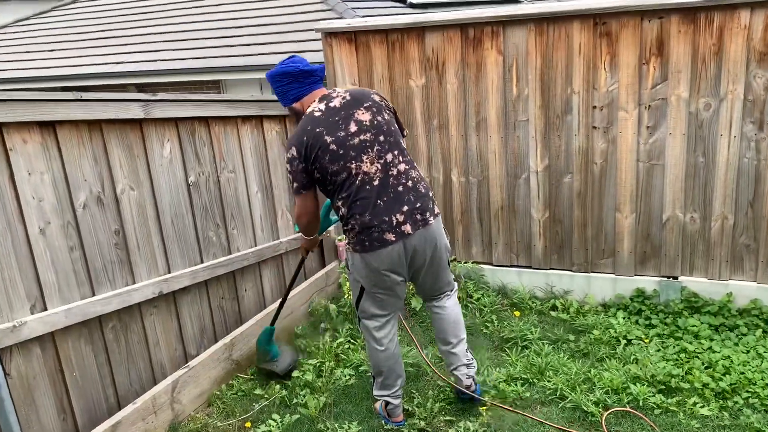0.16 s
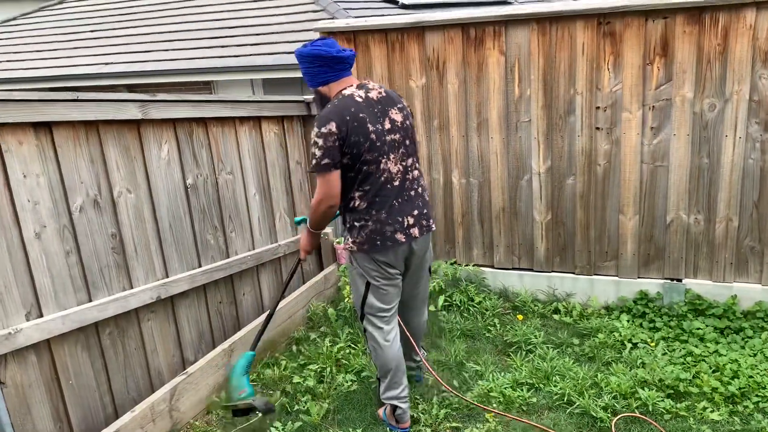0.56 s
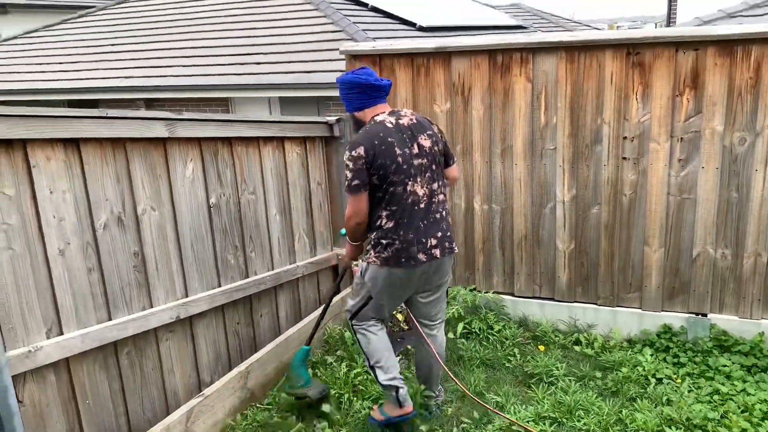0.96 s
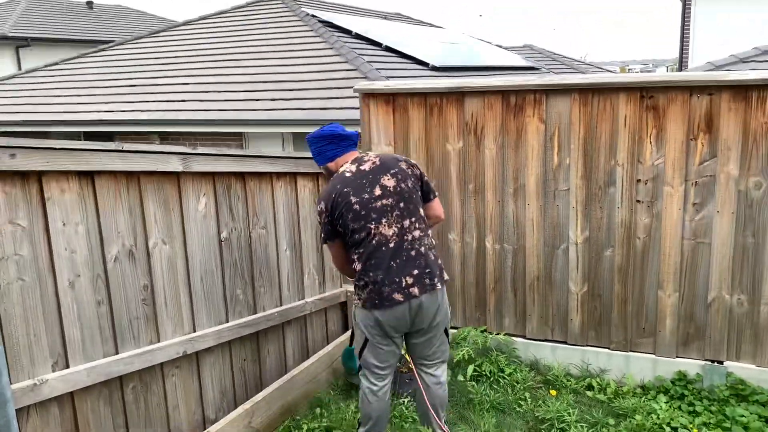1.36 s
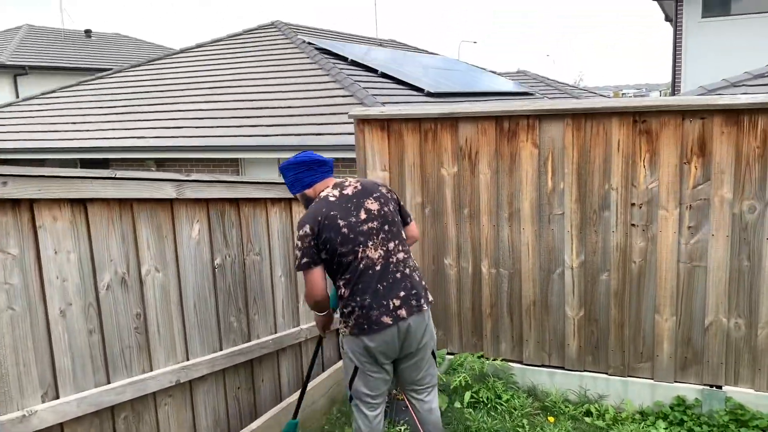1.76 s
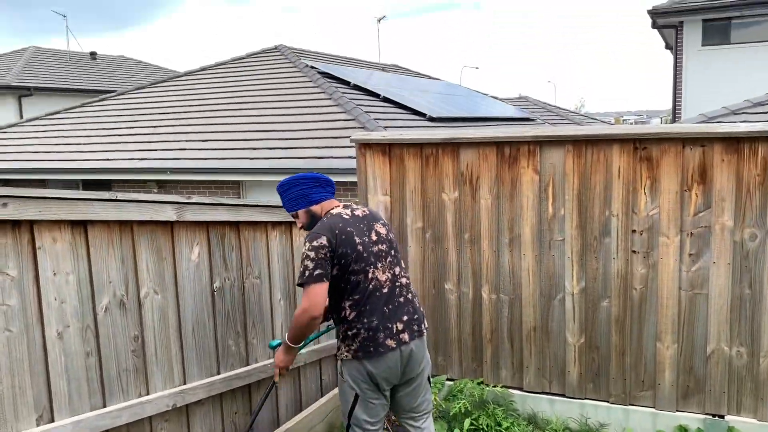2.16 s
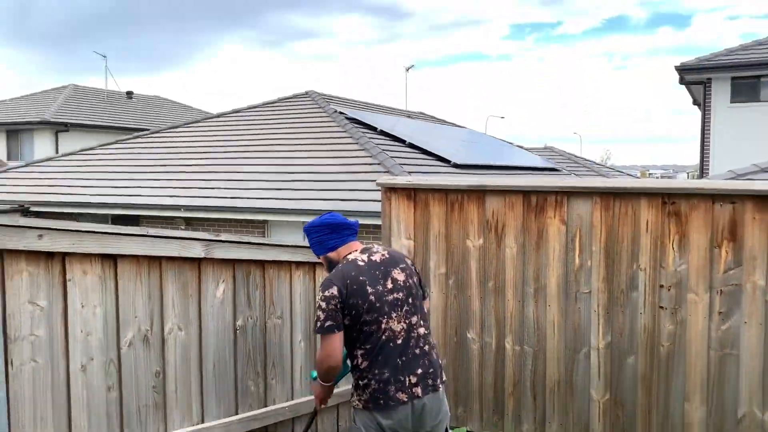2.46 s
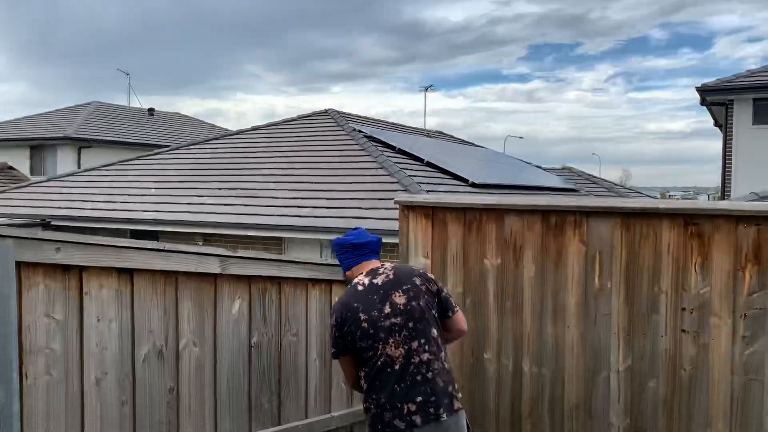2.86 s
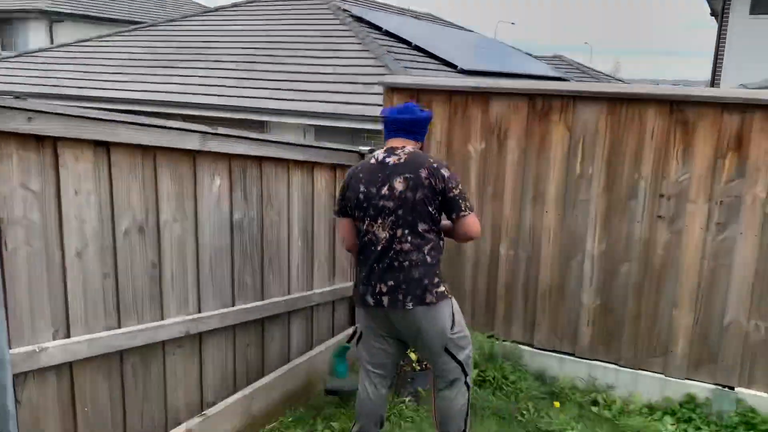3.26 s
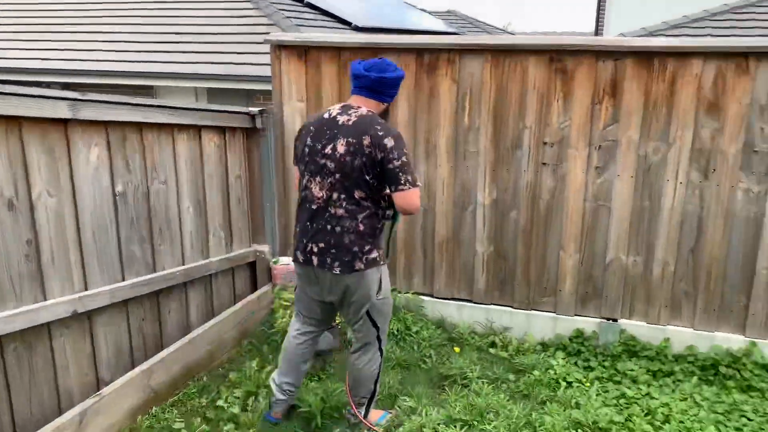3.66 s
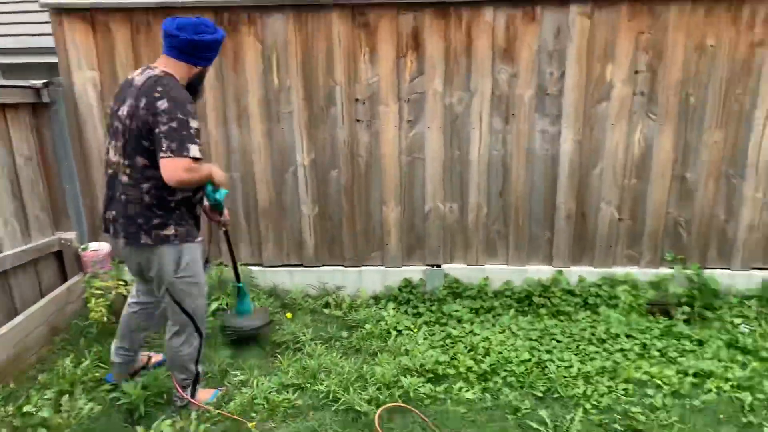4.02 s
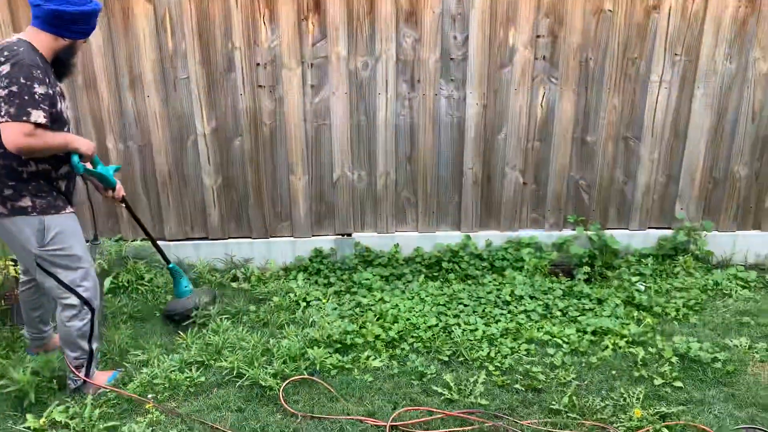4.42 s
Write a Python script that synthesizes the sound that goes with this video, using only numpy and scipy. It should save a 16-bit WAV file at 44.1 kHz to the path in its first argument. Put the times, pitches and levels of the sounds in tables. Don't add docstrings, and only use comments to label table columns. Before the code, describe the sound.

An electric string trimmer works along a wooden fence a few metres from a stereo camera microphone. It starts near full speed, a low motor hum around 190 Hz under airy line whistle, leafy fizz and rapid whipping. At 0.3 s the trigger is released and the pitch and whistle sink, with a snap near 0.7 s. Around 1 s it spins up again, knocking low and hollow near 1.3 s, with a hard crack at 1.4 s. It bogs in thick weeds at about 1.6-1.9 s, rough and throbbing, then recovers to a bright whine by 2.3 s. Sharp snaps and a knock come at 2.5-2.6 s. From 2.8 s it coasts down, growing deeper and quieter, with a brief brush at 3.55 s and tiny ticks after 4.1 s. At 4.3 s it bites back in with snaps and bright knocks, cut off while speeding up. Light wind and suburban rumble lie beneath, with short board echoes.

```python
import sys
import numpy as np
from scipy import signal
from scipy.fft import rfft, irfft, next_fast_len
from scipy.io import wavfile
from scipy.ndimage import uniform_filter1d, map_coordinates

SR = 44100
rng = np.random.default_rng(int(sys.argv[2]) if len(sys.argv) > 2 else 0)


def volts_from_decibels(level):
    exponent = np.asarray(level, float) / 20
    return 10 ** exponent


def store_pcm(level_fs):
    pcm = np.round(np.clip(level_fs, -1, 1) * 32767).astype(np.int16)
    wavfile.write(sys.argv[1], SR, np.atleast_2d(pcm).T)


N = 202379
T_S = np.arange(N) / SR


def unit(x):
    return x / np.sqrt(np.mean(x ** 2) + 1e-20)


def along(points, hz):
    f, value = np.transpose(points)
    return np.interp(np.log(hz + 1), np.log(f + 1), value)


def curves(rows):
    s, *columns = np.transpose(rows)
    return [np.interp(T_S, s, column) for column in columns]


def wobble(rate_hz):
    knots = rng.standard_normal(int(N * rate_hz / SR) + 4)
    return map_coordinates(knots, [np.arange(N) * rate_hz / SR])


def filtered(x, response):
    size = next_fast_len(N + 8192)
    return irfft(rfft(x, size) * response(np.fft.rfftfreq(size, 1 / SR)), size)[..., :N]


def coloured_noise(spectrum):
    return unit(filtered(rng.standard_normal((2, N)), lambda hz: volts_from_decibels(along(spectrum, hz))))


# t/s, f/Hz
DRIVEN_SPEED = [(0, 190.2), (.08, 185.2), (.31, 193), (1.07, 131.4), (1.15, 151.6), (1.32, 165.4),
                (1.53, 173.4), (1.65, 161), (1.78, 150), (1.88, 146.9), (1.99, 166.7), (2.12, 177.6),
                (2.31, 188.5), (2.45, 187.4), (2.62, 173.3), (2.79, 178.1), (4.47, 98.9), (4.59, 128.2)]
# let go t/s, pulled again t/s
COASTS = [
    (.31, .99),
    (2.79, 4.3),
]
EVEN_HZ = 63.3
SLOWING_RAD_PER_S = 0.357


def shaft():
    def run_down(off, now):
        start_hz = np.interp(off, *np.transpose(DRIVEN_SPEED))
        return EVEN_HZ * np.tan(np.arctan(start_hz / EVEN_HZ) - SLOWING_RAD_PER_S * (now - off))

    ends = [(on, run_down(off, on)) for off, on in COASTS]
    speed_hz, = curves(sorted(list(DRIVEN_SPEED) + ends))
    for off, on in COASTS:
        coasting = (T_S > off) & (T_S < on)
        speed_hz = np.where(coasting, run_down(off, np.clip(T_S, off, on)), speed_hz)
    return uniform_filter1d(speed_hz, size=SR // 40, mode="nearest")


FULL_HZ = 180


def speed_decades(speed_hz):
    return np.log10(speed_hz / FULL_HZ)


# t/s, depth over spinning free/dB, leafiness/dB, stalkiness/dB
WEEDS = [(0, 1, 3.5, -0.5), (.2, -2.5, -1, -16), (.6, 2.5, 4.5, -1), (.76, 1.5, 1, 7.5),
         (1.0, 1.5, 4.5, 1.5), (1.36, 7.5, 1, 0.5), (1.48, 6, 1.5, 6.5), (1.7, 12, 1.5, 2.5),
         (1.86, 13.5, -1.5, 5), (1.94, 4, 0.5, -1), (2.09, 7.5, 2, -19), (2.3, -0.5, 8.5, -27),
         (2.45, 6, 0, -26), (2.6, 8, 1, 4.5), (2.8, -2, 3.5, 0.5), (3.75, 1.5, 1, 5), (4.0, -7, 4, 0),
         (4.33, 8, 1.5, 7)]
# t/s, extra depth/dB, decay/s
CLUMPS = [(.05, 5.5, 0.13), (1.069, 0.5, 0.032), (1.385, 1.5, 0.025), (1.56, 1.5, 0.017), (1.72, 3.5, .05),
          (1.775, 1.5, 0.016), (1.83, 5.5, 0.027), (1.64, 1, 0.047), (2.505, 4, 0.027), (2.425, 5.5, 0.041),
          (2.573, 5.5, 0.0068), (3.555, 12, 0.043), (4.21, 8, 0.054), (4.405, 0.5, 0.045), (4.45, 8, 0.12),
          (4.57, -2, 0.015)]
# t/s, line ends in clear air/dB, guard rattling free/dB
CLEAR_AIR = [(0, -6.5, -3), (.35, -3.5, 2.5), (.7, 4.5, 1), (.86, 0, -4), (1.0, -0.5, -1), (1.1, 2, -1.5),
             (1.48, -3.5, -3.5), (1.6, -20, 2.5), (1.8, -8, 4.5), (1.9, 1.5, -5.5), (2.2, 5, 6.5),
             (2.39, -2, 5), (2.47, -20, 6.5), (2.75, -4.5, -3), (2.83, -1.5, -3), (4.04, 1, -5.5),
             (4.1, -1, -4), (4.59, -3.5, -1.5)]
CLUMP_RISE_S = 0.026
FIZZ_LINGERS_S, FIZZ_RETURNS_S = 0.16, 0.2


def effort(speed_hz):
    decades = speed_decades(speed_hz)
    clear_db, rattle_db = curves(CLEAR_AIR)
    depth_db, leafy_db, stalky_db = curves(WEEDS)
    for s, db, decay_s in CLUMPS:
        after, before = np.clip(T_S - s, 0, None), np.clip(s - T_S, 0, None)
        depth_db = depth_db + db * np.exp(-after / decay_s - before / CLUMP_RISE_S)
    slack = 0
    for off, on in COASTS:
        loosens = np.clip((T_S - off - FIZZ_LINGERS_S) / 0.058, 0, 1)
        tightens = np.clip((on + FIZZ_RETURNS_S - T_S) / 0.017, 0, 1)
        slack = slack + loosens * tightens
    whip_db = -33.5 + 56.5 * decades + depth_db
    return dict(
        whistle_db=-17 + 78 * decades + clear_db,
        whip_db=whip_db,
        fizz_db=whip_db + 10 + leafy_db - 5.5 * slack + 7.5 * decades,
        thud_db=whip_db - 9.5 - 18.5 * decades - 0.12 * clear_db + stalky_db,
        buzz_db=whip_db + 1.5 - 0.56 * depth_db + rattle_db,
        bite=np.clip(0.38 + 0.004 * depth_db, 0, 1),
        shake=np.clip(0.045 * depth_db, 0, 1))


HUM_DB = [-39, -44, -47, -50, -66, -66, -66]
# t/s, peak level/dB, half length/s
ORDER_1 = [(.04, -27, 0.12), (.29, -16, 0.077), (0.508, -25, 0.028), (0.6, -33.5, 0.075),
           (1.115, -24, 0.064), (1.252, -24, 0.094), (1.495, -33, 0.09), (1.7, -25, 0.087),
           (1.972, -23.5, 0.032), (2.132, -26, .06), (2.318, -17, 0.16), (2.746, -26, 0.097),
           (2.93, -27, 0.026), (3.095, -27, 0.14), (3.522, -37.5, 0.067)]
ORDER_2 = [(.4, -31.5, 0.093), (.72, -32, 0.047), (1.25, -36.5, 0.097), (1.5, -31.5, 0.11),
           (1.738, -21, .12), (2.08, -32.5, 0.14), (2.59, -28, 0.089), (2.85, -34.5, 0.099),
           (3.1, -38.5, 0.079), (3.51, -41.5, 0.052), (4.57, -28, 0.13)]
ORDER_3 = [
    (.2, -39, 0.091),
    (.5, -42, 0.012),
    (1.15, -40, 0.15),
    (1.42, -47, 0.023),
    (1.8, -29, 0.072),
    (2.12, -34, 0.19),
    (2.4, -31.5, 0.16),
    (2.7, -36, 0.064),
    (2.95, -44.5, 0.15),
    (4.48, -36.5, 0.068),
]
ORDER_4 = [
    (.29, -30, 0.044),
    (.48, -46.5, 0.2),
    (1.7, -28, 0.11),
    (1.98, -39, 0.1),
    (2.33, -34, 0.11),
    (2.5, -35, 0.049),
    (2.74, -34.5, 0.063),
    (4.51, -31, 0.026),
]
ORDER_5 = [
    (2.3, -41, 0.12),
    (3.0, -45, 0.052),
]
ORDER_6 = [
    (1.5, -32.5, 0.1),
    (2.78, -29.5, 0.047),
    (4.52, -39.5, 0.065),
]
ORDER_7 = [
    (.8, -38.5, 0.034),
    (2.5, -25.5, .05),
]


def swells(speed_hz):
    base_db = 24 * speed_decades(speed_hz)
    levels_db = []
    for db, rows in zip(HUM_DB, (ORDER_1, ORDER_2, ORDER_3, ORDER_4, ORDER_5, ORDER_6, ORDER_7)):
        level = volts_from_decibels(db + base_db)
        for s, peak_db, half_s in rows:
            level = level + volts_from_decibels(peak_db) * np.exp(-((T_S - s) / half_s) ** 2)
        levels_db.append(20 * np.log10(level))
    return levels_db


# order, level re buzz/dB
UPPER_ORDERS = [(5, -10), (8, -12.5), (11, -14), (14, -15.5), (20, -16), (32, -18)]


def hum(turns, order_db, buzz_db, shake):
    phase = 2 * np.pi * turns + (0.025 + 0.095 * shake) * wobble(50)
    low = high = 0
    for k, db in enumerate(order_db):
        low = low + volts_from_decibels(db + 3.5 + 2.4 * wobble(25.37)) * np.sin((k + 1) * phase + k)
    for order in range(5, 33):
        flicker_db = 2.6 * wobble(6.123) + 3 * wobble(18)
        level = volts_from_decibels(buzz_db + along(UPPER_ORDERS, order) + flicker_db)
        high = high + level * np.cos(order * phase + 1.25 * rng.random())
    return np.array([low + high, 0.063 * low + np.roll(high, 70)])


# multiple of shaft speed, level/dB
VORTEX = [(12, -40), (27, -24), (35, -10), (41, 0), (53, 0), (62, -8), (77, -18), (130, -29)]


def whistle(speed_hz):
    hz, t, z = signal.stft(rng.standard_normal((2, N)), SR, nperseg=512)
    gain = volts_from_decibels(along(VORTEX, hz[:, None] / np.interp(t, T_S, speed_hz)))
    gain = gain / np.sqrt(np.mean(gain ** 2, 0))
    return unit(signal.istft(z * gain, SR, nperseg=512)[1][:, :N])


def passes(turns, scatter_db, second_db, sharp):
    half = (2 * turns).astype(int)
    scatter = scatter_db * rng.standard_normal(half[-1] + 1)[half]
    since = 2 * turns % 1
    return unit(volts_from_decibels(scatter + second_db * (half % 2)) * np.sqrt(since) * np.exp(-sharp * since))


# f/Hz, level/dB
WHIP = [(60, -40), (200, -14), (500, -6.5), (900, -7), (2000, -5.5), (4000, -4), (8000, -38.5),
        (16000, -48.5)]
# f/Hz, level/dB
FIZZ = [(2500, -26.5), (5000, -10), (7500, -5.5), (9500, -2), (12000, -1.5), (13500, -6), (16000, -9.5)]
# f/Hz, level/dB
THUD = [(90, -30), (160, -4), (260, -1.5), (420, 3.5), (900, -7), (2000, -17)]


def line(speed_hz, turns, whistle_db, whip_db, fizz_db, thud_db, bite):
    sweep = passes(turns, scatter_db=-2.0, second_db=-9.0, sharp=1.97)
    lash = passes(turns + 0.16, scatter_db=5.5, second_db=4.5, sharp=9.1)
    strokes = (1 - bite) * sweep + bite * lash

    def throb(depth):
        return (1 - depth) + depth * strokes

    air = volts_from_decibels(whistle_db + 1.7 * wobble(11)) * throb(0.08) * whistle(speed_hz)
    fizz = volts_from_decibels(fizz_db + 1.5 + 0.59 * wobble(14)) * throb(0.78) * coloured_noise(FIZZ)
    whip = volts_from_decibels(whip_db + 0.29 * wobble(16)) * throb(0.49) * coloured_noise(WHIP)
    thud = volts_from_decibels(thud_db + 2.5 * wobble(18)) * throb(1.0) * coloured_noise(THUD)
    return air + fizz + whip + thud


# t/s, level/dB
WIND = [
    (0, -57),
    (.3, -59),
    (.5, -46),
    (.9, -45.5),
    (1.5, -36.5),
    (2.25, -38.5),
    (2.55, -49),
    (4.15, -57.5),
    (4.59, -33.5),
]
# f/Hz, level/dB
RUMBLE = [(20, -25), (35, -13), (50, -0.5), (90, -6), (140, -6.5), (300, -27.5)]
# f/Hz, level/dB
YARD = [(35, -12), (60, 5), (2710, -32.5), (7200, -46), (7900, -48), (12000, -57), (13500, -60),
        (15500, -34)]
YARD_DB = -43


def background():
    buffet = volts_from_decibels(curves(WIND)[0] + 2 + 3.2 * wobble(6.12)) * coloured_noise(RUMBLE)
    hush = volts_from_decibels(YARD_DB + wobble(2.85)) * coloured_noise(YARD)
    return buffet + hush


# t/s, peak level/dB, dull part re peak/dB, t60/s
SNAPS = [(0.6745, -12, -15.5, 0.02), (0.7384, -30, -27, 0.009), (1.0605, -22, -27, 0.039),
         (1.377, -5, -9.5, 0.055), (1.5703, -19, -26, 0.067), (1.8417, -7, -13, 0.055),
         (2.5744, -3, -30, 0.022), (2.617, -9, -19, 0.036), (3.521, -27, -21, 0.035),
         (4.1127, -33.5, -9, 0.034), (4.1504, -40, -2, 0.024), (4.1714, -50, -17, 0.03),
         (4.1873, -33, -7.5, 0.026), (4.2871, -37, -20, 0.026), (4.351, -42, -15, 0.029),
         (4.3917, -20.5, -19, 0.022), (4.4049, -20, -22, 0.03), (4.4418, -15, -17, 0.055),
         (4.4957, -15.5, -25, 0.042), (4.574, -8, -22.5, 0.036)]


def snaps():
    bright, dull = np.zeros(N + SR), np.zeros(N + SR)
    t = np.arange(SR // 8) / SR
    for s, db, dull_db, t60_s in SNAPS:
        fade = volts_from_decibels(db - 0.5 - 60 * t / t60_s)
        bright[round(s * SR):][:len(t)] += fade
        dull[round(s * SR):][:len(t)] += fade * volts_from_decibels(dull_db)
    return bright[:N] * coloured_noise(FIZZ) + dull[:N] * coloured_noise(WHIP)


# t/s, peak level/dB, f/Hz, t60/s
KNOCKS = [
    (1.27, -30, 274, .12),
    (1.329, -24.5, 287, 0.097),
    (2.505, -19, 1160, 0.063),
    (3.55, -35, 715, 0.082),
    (4.07, -38, 2080, 0.037),
    (4.35, -37, 550, 0.055),
    (4.402, -21, 1138, 0.039),
    (4.51, -25.5, 1150, 0.08),
    (4.57, -25, 1150, 0.048),
]


def knocks():
    out, t = np.zeros(N + SR), np.arange(SR // 5) / SR
    for s, db, hz, t60_s in KNOCKS:
        ring = 2.5 * np.sin(2 * np.pi * hz * t)
        attack = 1 - np.exp(-t / 0.0045)
        out[round(s * SR):][:len(t)] += volts_from_decibels(db - 60 * t / t60_s) * attack * ring
    return np.array([out[:N], 0.27 * out[:N]])


# delay t/s, level/dB
FENCE = [
    (.0041, -8.5),
    (.0073, -5),
    (0.0128, -8.5),
    (0.019, -14),
    (.0241, -31),
]


def fence(x):
    dull = filtered(x, lambda hz: 1 / (1 + 1j * hz / 2500))
    out = x
    for delay_s, db in FENCE:
        out = out + volts_from_decibels(db) * np.pad(dull, ((0, 0), (round(delay_s * SR), 0)))[:, :N]
    return out


# t/s, f of port opposition/Hz, likeness there 0-1
BEARING = [(0.152, 2820, 0.73), (.25, 2670, 0.44), (.7, 3120, 0.43), (.97, 3170, 0.4), (1.06, 3294, 0.75),
           (1.2, 4470, 0.8), (1.331, 4430, 0.6), (1.5, 3510, 0.61), (1.72, 3270, 0.81), (1.85, 2820, 0.2),
           (1.95, 2696, 0.7), (2.3, 2570, 0.83), (2.4, 2945, 0.2), (2.75, 4490, 0.46), (3.2, 3100, 0.4),
           (3.6, 2620, 0.09), (4.15, 4740, 0.55), (4.3, 2650, 0.3)]
# f/Hz, phase/rad
LEAD = [(6000, 6.3), (7000, 6), (8700, 3.1), (10300, .45), (11800, -.45), (12700, -2.5), (14200, -3.8),
        (15100, -5.8), (16000, -6.4)]
# f/Hz, likeness 0-1
ALIKE = [(60, 1), (300, 0.55), (700, 0.39), (1500, 1), (2200, 0.46), (4500, 0.043), (6500, 0.56)]
ALIKE_TOP = [(8300, .93), (16000, .97)]
# f/Hz, level/dB
TILT = [(60, -2), (110, 0.5), (200, 2.5), (380, 0.5), (700, -3), (1290, -0.5), (2380, -1.5), (4400, -0.5),
        (8120, -0.5), (15000, -1.5)]


def ports(pair):
    hz, t, z = signal.stft(pair, SR, nperseg=1024)
    s, null_hz, match = np.transpose(BEARING)
    null_hz, match = np.interp(t, s, null_hz), np.interp(t, s, match)
    lead_hz, lead_rad = np.transpose(LEAD)
    lead = np.transpose([np.interp(hz, [300, 0.45 * null, null, *lead_hz], [-0.1, 0.8, np.pi, *lead_rad])
                         for null in null_hz])
    near_null = np.exp(-((hz[:, None] - null_hz) / 900) ** 2)
    usual = along(list(ALIKE) + list(ALIKE_TOP), hz)[:, None]
    alike = (1 - near_null) * usual + near_null * match
    turn = np.arccos(np.clip(alike, -1, 1)) / 2
    mid, side = z[0] * np.cos(turn), z[1] * np.sin(turn)
    shift = np.exp(0.5j * lead) * volts_from_decibels(0.5 * along(TILT, hz))[:, None]
    return signal.istft([(mid + side) * shift, (mid - side) / shift], SR, nperseg=1024)[1][:, :N]


def scene():
    speed_hz = shaft()
    levels = effort(speed_hz)
    turns = np.cumsum(speed_hz) / SR
    head = hum(turns, swells(speed_hz), levels.pop("buzz_db"), levels.pop("shake"))
    cutting = line(speed_hz, turns, **levels)
    return ports(fence(cutting + knocks()) + head + background()) + fence(snaps())


# f/Hz, level/dB
MARGIN = [(2100, 4), (4500, 5.5), (8000, 7), (13500, 9.5)]


def joint_stereo(x, from_hz):
    hz, _, z = signal.stft([x[0] + x[1], x[0] - x[1]], SR, nperseg=2048)
    band = np.arange(len(hz)) // 12
    power = np.add.reduceat(abs(z) ** 2, np.arange(0, len(hz), 12), axis=1)[:, band]
    strong = power > volts_from_decibels(-2 * along(MARGIN, hz))[:, None] * power[::-1]
    keep = strong | (hz < from_hz)[:, None]
    total, diff = signal.istft(z * keep, SR, nperseg=2048)[1][:, :N] / 2
    return np.array([total + diff, total - diff])


def band_limit(x):
    return signal.sosfilt(signal.butter(12, 16510, fs=SR, output="sos"), x)


def record(dry):
    bass_cut_hz, top_hz = 38, 15800
    x = filtered(dry, lambda hz: (hz < top_hz) / (1 + (bass_cut_hz / (hz + 1)) ** 6))
    mix = np.clip(joint_stereo(x, from_hz=1800), -1, 1)
    return band_limit(mix)


dry = scene()
out = record(dry)
store_pcm(out)
```